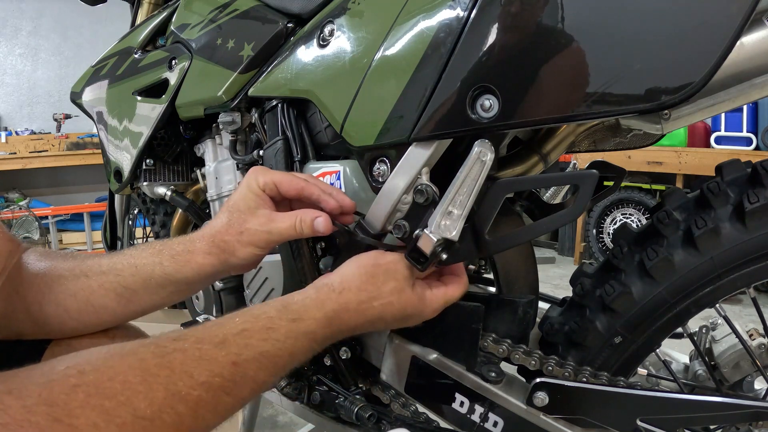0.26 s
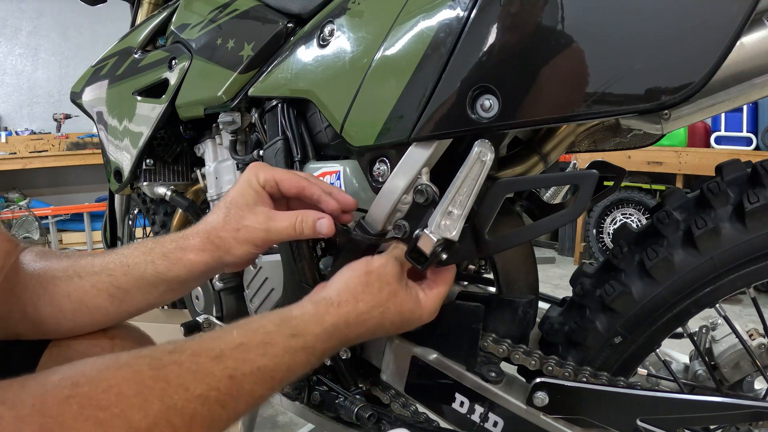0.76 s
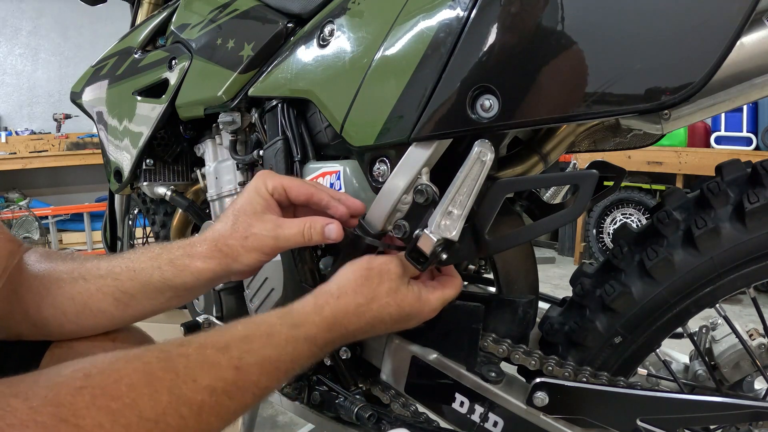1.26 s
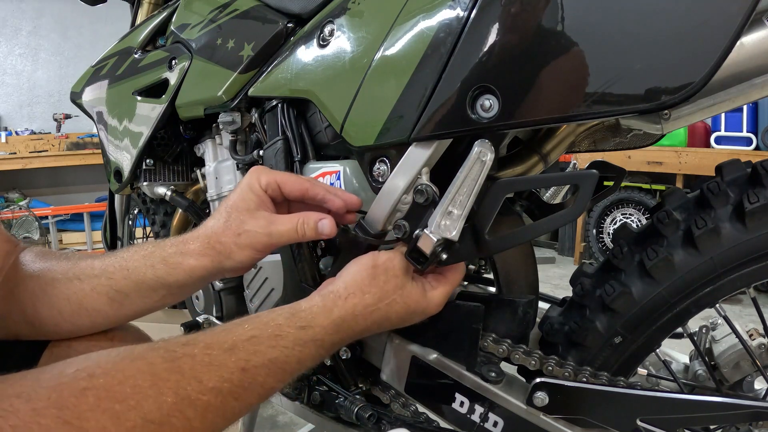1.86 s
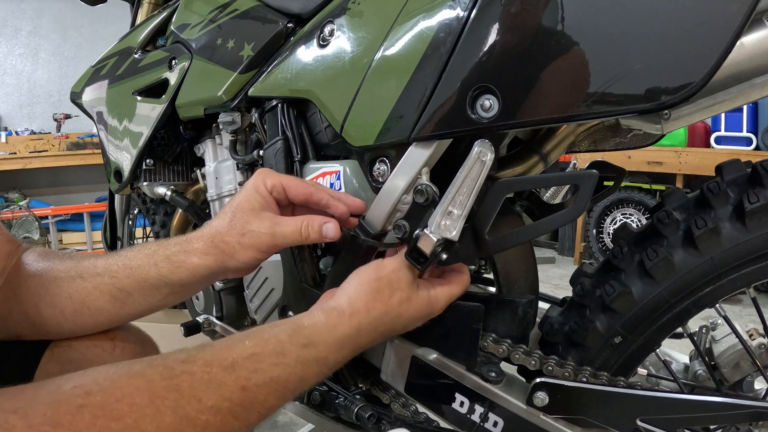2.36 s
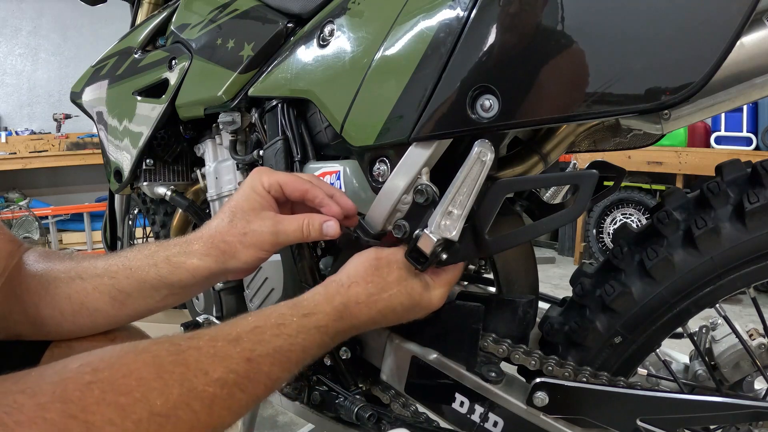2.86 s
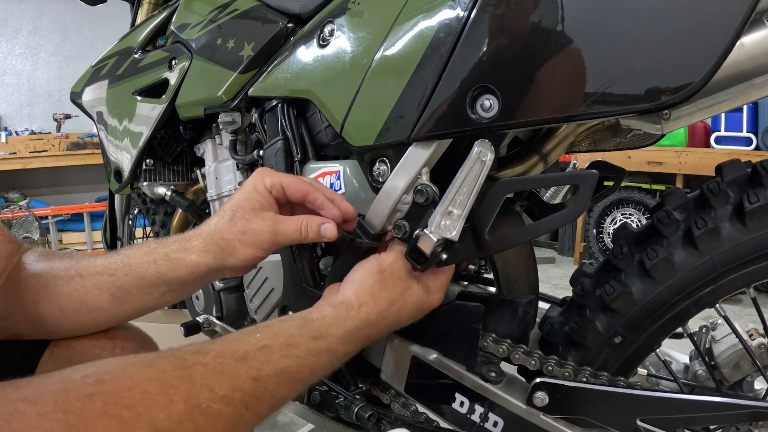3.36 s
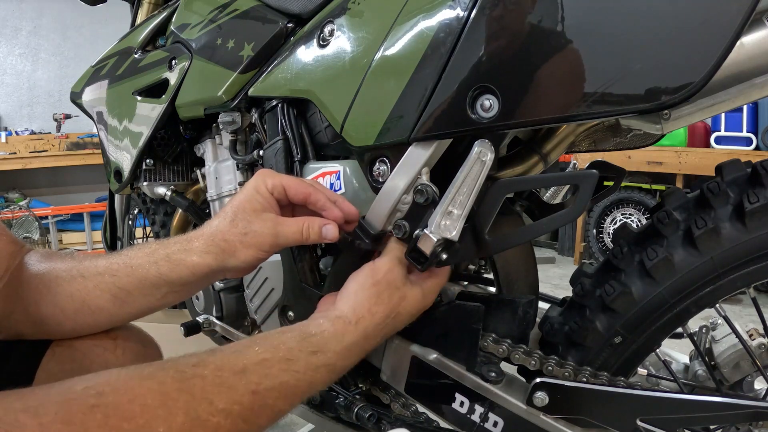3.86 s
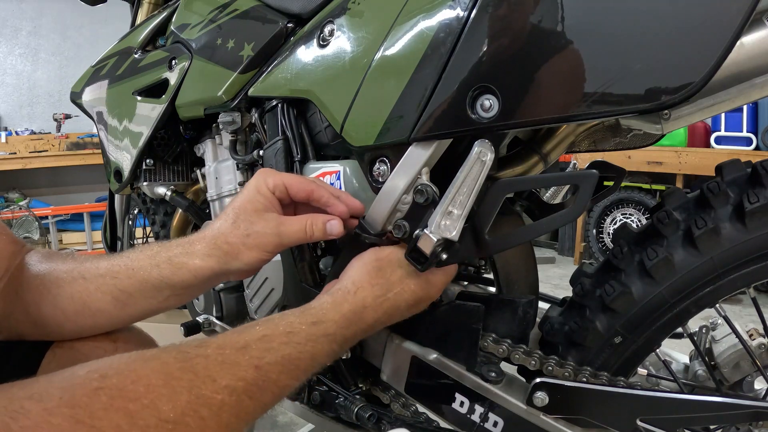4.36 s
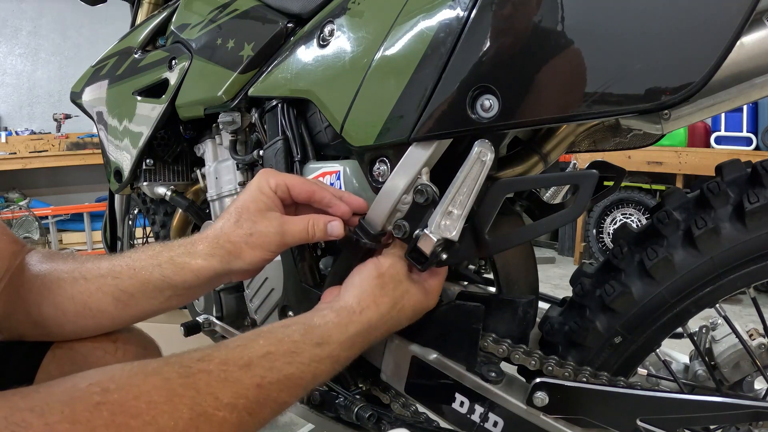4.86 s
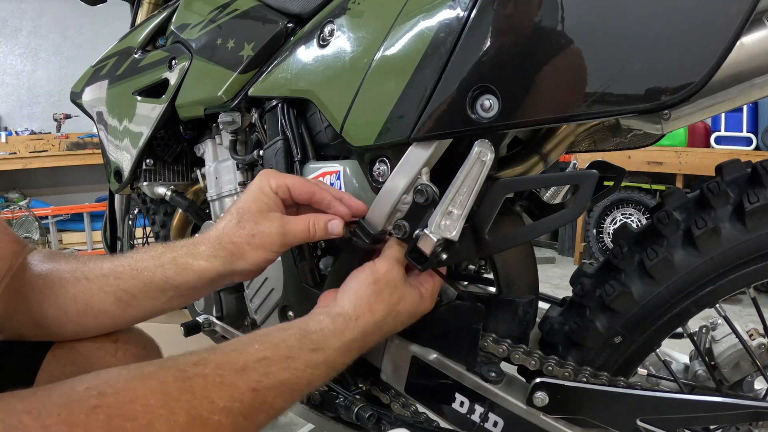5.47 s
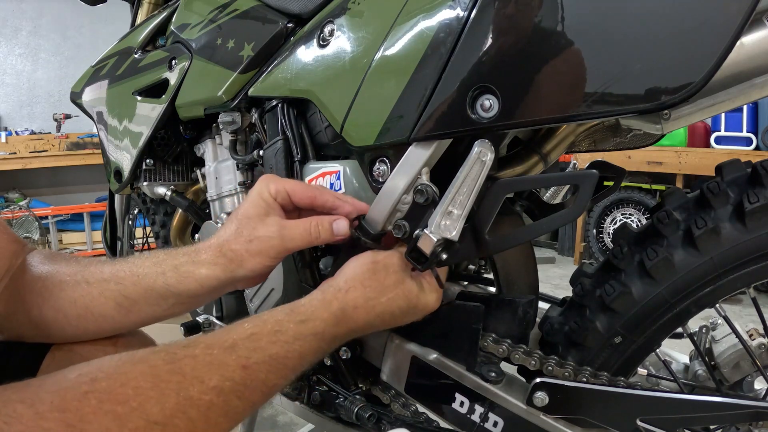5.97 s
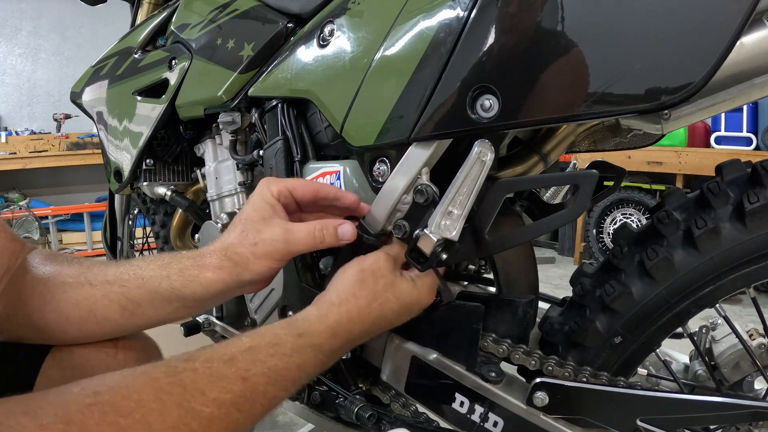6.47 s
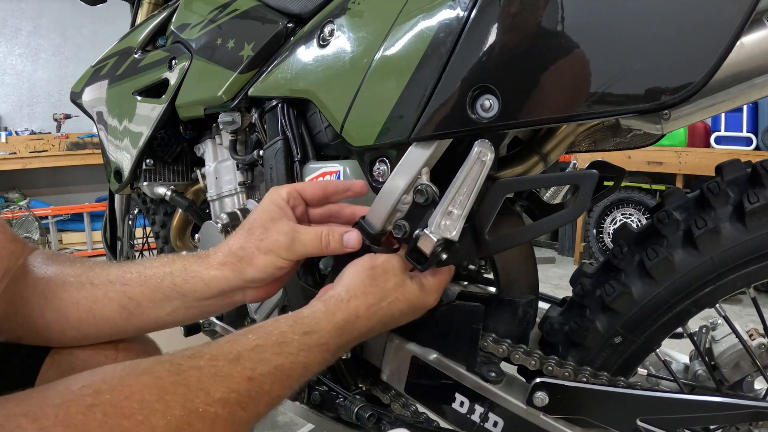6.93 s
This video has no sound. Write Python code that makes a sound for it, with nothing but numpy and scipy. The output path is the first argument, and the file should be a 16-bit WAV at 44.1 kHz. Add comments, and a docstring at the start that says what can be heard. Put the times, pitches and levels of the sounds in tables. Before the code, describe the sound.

The echo of an earlier tug fades as the sound opens, then tight zipping runs of hard plastic ratchet teeth follow, with pauses between. Tiny strap ticks and a very faint nylon rub fill some gaps. The close microphones catch dry, snappy clicks with little bass, nearly centred with slightly wide treble, scattering off the bike into a live garage above a low fan.

```python
"""In a garage, close by, a nylon cable tie is pulled tight on a dirt bike in short tugs.
At every tooth the pawl snaps down: damped resonances ring high for the pawl, lower for the taut strap,
and knock for the bike part under it. Each click scatters off the bike and hangs in the room as decaying noise.
Filtered noise makes the faint rub of the strap and the steady rush and wavering hum of a fan."""
import sys
import numpy as np
from scipy import signal
from scipy.fft import rfft, irfft
from scipy.io import wavfile

SR = 44100
rng = np.random.default_rng(int(sys.argv[2]) if len(sys.argv) > 2 else 0)


def to_wav(s):
    """Save 16-bit WAV."""
    ch = np.atleast_2d(s).T  # columns
    pcm = np.round(np.clip(ch, -1, 1) * 32767)  # PCM
    wavfile.write(sys.argv[1], SR, pcm.astype(np.int16))


N = 317520
LEAD_IN = SR // 4   # samples ahead of 0 s, so that an earlier pull can leave its echo


def from_db(db):
    """Decibels to gain."""
    return 10 ** (np.asarray(db) / 20)


def unit_energy(x):
    """Scale so that the squares sum to 1."""
    return x / np.sqrt(np.sum(x ** 2) + 1e-20)


def at_hz(points, hz):
    """Read a table on a log-frequency axis."""
    knots, values = np.transpose(points)
    return np.interp(np.log(np.maximum(hz, 1)), np.log(knots), values)


def coloured_noise(gain):
    """Noise of rms 1 whose spectrum follows the function gain(Hz)."""
    hz = np.arange(N // 2 + 1) * SR / N
    noise = irfft(rfft(rng.standard_normal(N)) * gain(hz), N)
    return np.sqrt(N) * unit_energy(noise)


def narrow_noise(hz, width_hz):
    """A wavering tone of rms 1: noise twice through a narrow resonance."""
    return coloured_noise(lambda f: 1 / (1 + (2 * (f - hz) / width_hz) ** 2))


def ring(hz, width_hz, t):
    """A damped resonance that swells briefly and dies, faster the wider it is; energy 1."""
    t = np.maximum(t, 0)
    return unit_energy(t * np.exp(-np.pi * width_hz * t) * np.sin(2 * np.pi * hz * t))


def fan(rush_db=-47, hum_width_hz=9):
    """Broad rush of air, as shaped noise, with a few wavering tones."""
    # The rush of air. Each row: frequency in Hz, relative level in dB per Hz.
    rush_spectrum = [(20, -25), (60, -23.5), (100, -13.5), (135, -6), (165, -6), (210, 2), (290, 2),
                     (400, 0.5), (600, -3.5), (1000, -9), (2000, -13), (5000, -26), (7000, -34.5),
                     (8500, -47.5), (12000, -46.5), (14000, -55.5)]
    # The wavering hum. Each row: frequency in Hz, level in dB rms.
    hum_tones = [(160.5, -61), (240, -58.5), (286, -56), (344.8, -57), (479.5, -70.5), (559.5, -63)]
    rush = from_db(rush_db) * coloured_noise(lambda f: from_db(at_hz(rush_spectrum, f)))
    hum = sum(from_db(db) * narrow_noise(hz, hum_width_hz) for hz, db in hum_tones)
    return rush + hum


def teeth(reload_s=0.005, pawl_rise_db=2.5, pawl_spread_db=2, strap_spread_hz=120):
    """Teeth pass in runs; within a pull the gaps grow or shrink by a steady ratio.

    Yields s, dB, strap Hz, tail Hz, then knock, pawl, tail and head in dB re strap."""
    # Each tug moves the strap in a few pulls, a run of teeth each; the pull before 0 s leaves mostly echo.
    # Each row: start in seconds, end in seconds, count of teeth, ratio of each gap to the one before,
    # strap level in dB at the start, swell over the pull in dB, mean strap resonance in Hz,
    # knock level in dB, pawl level in dB before its rise, spread and lift.
    pulls = [(-0.075, -0.019, 3, 1.0, -6.5, 2.5, 4300, -10, -12),
             (1.0059, 1.0638, 4, 0.46, -6.5, -2.5, 4770, -13.5, -8.5),
             (1.083, 1.1525, 4, 1.07, -14, 2.5, 4550, -22, -15.5),
             (2.009, 2.0562, 4, 0.51, -11.5, 4, 4870, -17.5, -10),
             (2.0654, 2.0804, 2, 1.0, -10, -1, 4250, -21, -18),
             (2.0955, 2.1551, 4, 1.16, -6.5, -0.5, 5430, -30, -13),
             (2.1743, 2.2522, 4, 1.23, -6.5, -1.5, 5480, -21, -11.5),
             (2.819, 2.8976, 4, 1.17, -20, 6, 5200, -21, -15),
             (2.9186, 2.9752, 4, 0.97, -9.5, -2, 5450, -23, -9),
             (3.517, 3.5838, 6, 0.92, -14, 1, 5450, -20.5, -15.5),
             (3.6054, 3.6982, 5, 1.1, -11.5, 1, 5500, -22.5, -9.5),
             (4.2915, 4.3247, 6, 1.21, -3.5, -7, 4600, -13, -11.5),
             (4.3332, 4.466, 4, 2.32, -10, -1.5, 5140, -20.5, -13.5),
             (4.9727, 4.9925, 2, 1.0, -6.5, -2, 4700, -19.5, -15),
             (5.0154, 5.0915, 7, 0.93, -9.5, -3, 5330, -19, -11),
             (5.117, 5.1494, 2, 1.0, -11, -0.5, 4200, -24.5, -16.5),
             (5.9608, 6.0298, 4, 1.2, -11, 1, 4240, -21.5, -19),
             (6.078, 6.102, 2, 1.0, -11, -2.5, 4320, -17, -20),
             (6.1221, 6.1878, 3, 1.63, -20, -8, 4800, -19, -13),
             (6.9654, 6.996, 5, 1.46, -4.5, -16, 4300, -13, -12.5),
             (7.0368, 7.16, 2, 1.0, -17, 1, 4370, -16, -13)]
    # The grip decides how the loose tail and the head ring; each pull takes the row nearest in time.
    # Each row: time in seconds, tail resonance in Hz, tail level in dB, head level in dB.
    grips = [(1.08, 2520, -20, -24), (2.02, 2200, -14.5, -21), (2.13, 2230, -16.5, -28),
             (2.9, 2000, -18, -19.5), (3.6, 2300, -22, -20), (4.35, 2580, -23, -15), (5.06, 2360, -22, -16),
             (6.07, 2550, -17.5, -20), (7.0, 2650, -14, -25)]
    before = -1
    for start, end, count, ratio, strap_db, swell_db, strap_hz, knock_db, pawl_db in pulls:
        _, tail_hz, tail_db, head_db = min(grips, key=lambda grip: abs(grip[0] - start))
        gaps = ratio ** np.arange(round(count) - 1)
        times = start + (end - start) * np.append(0, np.cumsum(gaps)) / gaps.sum()
        for s, progress in zip(times, np.linspace(0, 1, len(times))):
            db = strap_db + swell_db * progress
            # no two teeth are quite alike, and the pawl snaps harder as a pull goes on
            hz = strap_hz + strap_spread_hz * rng.standard_normal()
            snap_db = pawl_db + pawl_rise_db * (progress - .5) + pawl_spread_db * rng.standard_normal()
            # the strap needs time to tighten again: a tooth hard on the heels of another is weaker
            tension_db = 20 * np.log10(1 - np.exp(-abs(s - before) / reload_s))
            yield s, db + tension_db, hz, tail_hz, knock_db - db, snap_db - db, tail_db - db, head_db - db
            before = s


def ticks(strap_hz=4500, tail_hz=2550, knock_db=-5, pawl_db=-17, tail_db=-9, head_db=-11):
    """The shifting strap rings like a tooth, but hardly stirs the pawl; part levels are re strap."""
    # Between tugs the strap shifts and no tooth passes. Each row: time in seconds, strap level in dB.
    shifts = [(0.334, -36.5), (0.5577, -34), (5.3119, -19), (5.44, -35)]
    return [(s, db, strap_hz, tail_hz, knock_db, pawl_db, tail_db, head_db) for s, db in shifts]


def scattered(click, paths):
    """The direct click plus its reflections off the hands and bike; energy 1."""
    return unit_energy(click + signal.fftconvolve(click, paths)[:len(click)])


def ratchet(crack_width_hz=3400, strap_width_hz=1200, strap_ring_db=-6, tail_width_hz=1400,
            head_hz=7450, head_width_hz=1400, pawl_hz=11300, pawl_width_hz=2500, pawl_lag_s=0.00026,
            pawl_lift_db=1.0, scatter_db=-3.5, scatter_t60_s=0.023, hand_still_s=0.052,
            return_s=0.0006166, return_db=-8, spill_hz=4900, spill_width_hz=5000,
            spill_pawl_width_hz=5000, spill_pawl_db=-2):
    """Every tooth or tick is one click of damped rings: direct to the microphones, and spilt into the room."""
    # Damped modes of the part that the tie is wrapped round.
    # Each row: frequency in Hz, width in Hz, relative level in dB.
    knock_modes = [(612, 570, 0.5), (944, 610, 0), (1600, 710, 4.5)]
    direct, spill = np.zeros((2, LEAD_IN + N + SR))
    t = np.arange(SR // 40) / SR
    # the jerk runs along the strap and comes back inverted from the held end
    returning = -from_db(return_db) * np.sinc((t - return_s) * SR)
    scatter_fade = from_db(-60 * t / scatter_t60_s) * (t > return_s)
    thud = sum((-1) ** k * from_db(mode_db) * ring(hz, width, t)
               for k, (hz, width, mode_db) in enumerate(knock_modes))
    snap = ring(pawl_hz, pawl_width_hz, t - pawl_lag_s)   # the pawl lands just after the strap jerks
    nearby, before = rng.standard_normal(len(t)), -1
    for s, db, strap_hz, tail_hz, knock_db, pawl_db, tail_db, head_db in [*teeth(), *ticks()]:
        # the hands move slowly, so clicks close in time share their reflections
        alike = np.exp(-abs(s - before) / hand_still_s)
        nearby = alike * nearby + np.sqrt(1 - alike ** 2) * rng.standard_normal(len(t))
        before = s
        paths = returning + from_db(scatter_db) * unit_energy(nearby * scatter_fade)

        crack = ring(strap_hz, crack_width_hz, t)
        crack = crack + from_db(strap_ring_db) * ring(strap_hz, strap_width_hz, t)
        strap = scattered(crack, paths)
        tail = from_db(tail_db) * scattered(ring(tail_hz, tail_width_hz, t), paths)
        head = from_db(head_db) * scattered(ring(head_hz, head_width_hz, t), paths)
        knock_gain, pawl_gain = from_db(knock_db), from_db(pawl_db + pawl_lift_db)
        knock, pawl = knock_gain * scattered(thud, paths), pawl_gain * scattered(snap, paths)
        at = LEAD_IN + round(s * SR) + np.arange(len(t))
        direct[at] += from_db(db) * (strap - tail - head + knock + pawl)

        # summed over all directions the strap's resonances even out
        strap_spill = ring(spill_hz, spill_width_hz, t)
        pawl_spill = from_db(spill_pawl_db) * pawl_gain * ring(pawl_hz, spill_pawl_width_hz, t)
        spill[at] += from_db(db) * (strap_spill + knock_gain * unit_energy(thud) - pawl_spill)
    return direct[:LEAD_IN + N], spill[:LEAD_IN + N]


def garage(x, build_s=0.001):
    """Diffuse echo: noise that builds up quickly and dies band by band."""
    # How long the garage rings. Each row: frequency in Hz, time to fall 60 dB in seconds.
    ring_times = [(500, 1.6), (2000, 0.37), (5000, 0.86), (8000, 0.6), (12000, 0.51)]
    # How loud its echo is. Each row: frequency in Hz, band level in dB.
    echo_levels = [(400, 0), (1200, -15), (2200, -5.5), (3600, -8), (5500, -10), (7500, -7.5), (9500, -8),
                   (13000, -8.5)]
    t, response = np.arange(SR) / SR, 0
    white = rng.standard_normal((2, SR))
    edges = np.geomspace(250, 16000, 13)   # band edges, Hz
    for k, (low, high) in enumerate(zip(edges, edges[1:])):
        hz = np.sqrt(low * high)
        decay = unit_energy(from_db(-60 * t / at_hz(ring_times, hz)) * (1 - np.exp(-t / build_s)))
        band_filter = signal.butter(2, [low, high], "band", fs=SR, output="sos")
        band = signal.sosfilt(band_filter, white[k % 2])   # neighbouring bands use separate noise
        response = response + from_db(at_hz(echo_levels, hz)) * decay * band
    return signal.fftconvolve(x, response)[:len(x)]


def rub():
    """A faint squeal of nylon sliding on nylon: narrow noises under one envelope."""
    # The strap rubs through the head as the slack is taken up.
    # Each row: time in seconds, gain on the squeal in dB.
    rub_envelope = [(0.34, -95), (0.37, -66), (0.40, -95), (4.65, -95), (4.80, -67), (4.89, -62),
                    (4.95, -64), (4.98, -95)]
    # Resonances of that rubbing. Each row: frequency in Hz, width in Hz, relative level in dB.
    squeal_modes = [(5130, 710, 2), (6940, 600, -11), (9900, 700, -18)]
    s, db = np.transpose(rub_envelope)
    squeal = sum(from_db(mode_db) * narrow_noise(hz, width) for hz, width, mode_db in squeal_modes)
    return np.interp(np.arange(N) / SR, s, from_db(db), left=0, right=0) * squeal


def stereo_spread(direct, spill, slope_gain=.55, tie_gain=.28, sway=1.0, sway_hz=40):
    """Nearly mono in the lows and mids; the treble of clicks, echo and fan spreads to the sides."""
    # How far the sound spreads. Each row: frequency in Hz, gain on the side signal in dB.
    side_levels = [(30, -18.5), (140, -54), (2000, -48), (3500, -41.5), (6000, -22), (8500, -21.5),
                   (10800, -15), (11800, -8), (12700, -4), (15000, 1)]
    # the spread of the clicks shifts from click to click
    bearing = slope_gain + sway * coloured_noise(lambda f: 1 / (1 + (f / sway_hz) ** 2))
    tie = direct[LEAD_IN:]
    mid = tie + garage(spill)[LEAD_IN:] + rub() + fan()
    # echo and fan are drawn afresh for the sides
    spread = bearing * np.gradient(tie) - tie_gain * tie + garage(spill)[LEAD_IN:] + fan()
    hz = np.arange(N // 2 + 1) * SR / N
    side = irfft(rfft(spread) * from_db(at_hz(side_levels, hz)), N)
    return np.array([mid + side, mid - side])


def scene(lowest_hz=330):
    """The tie and its echo over the fan; so small a source radiates little bass."""
    high_pass = signal.butter(3, lowest_hz, "high", fs=SR, output="sos")
    direct, spill = signal.sosfilt(high_pass, ratchet())
    return stereo_spread(direct, spill)


def record(dry, notch_hz=9080, notch_q=18, top_hz=12600, cutoff_hz=16400):
    """A narrow notch near 9 kHz, and a dull top: little sounds above 12.6 kHz."""
    x = signal.lfilter(*signal.iirnotch(notch_hz, notch_q, fs=SR), dry)
    x = signal.sosfilt(signal.butter(8, top_hz, fs=SR, output="sos"), x)
    return signal.sosfilt(signal.ellip(8, .1, 80, cutoff_hz, fs=SR, output="sos"), x)


dry = scene()
out = record(dry)
to_wav(out)
```